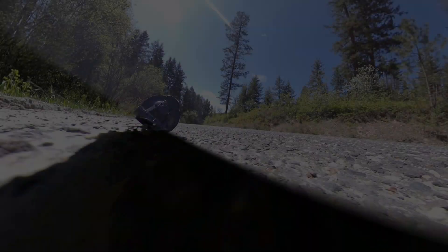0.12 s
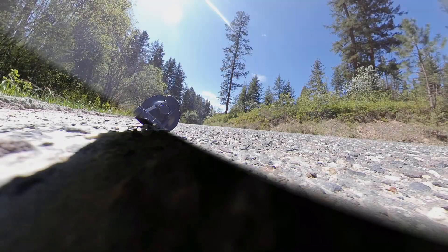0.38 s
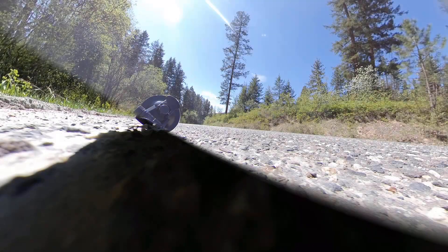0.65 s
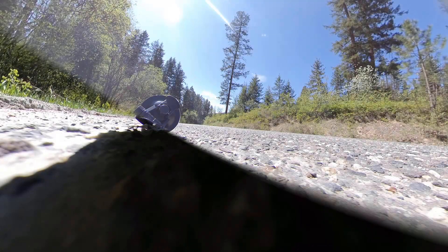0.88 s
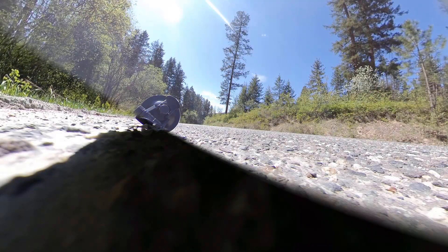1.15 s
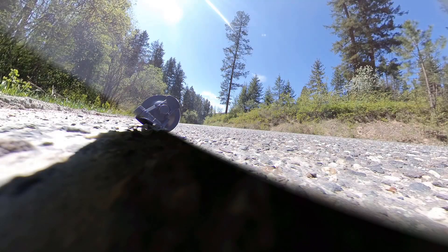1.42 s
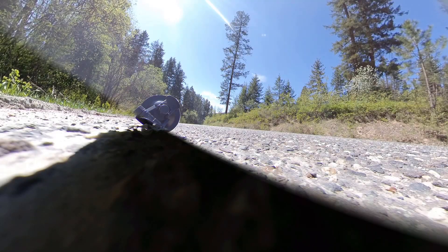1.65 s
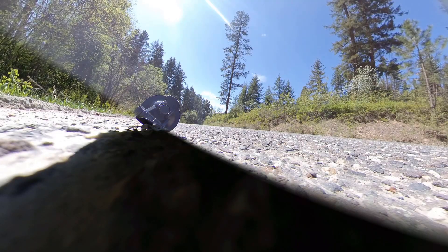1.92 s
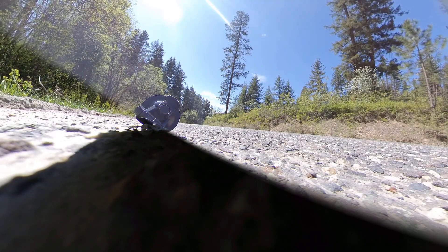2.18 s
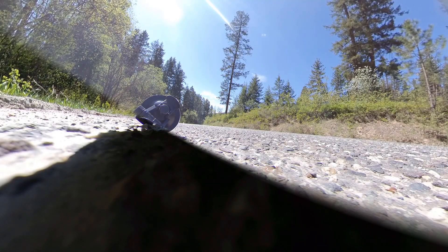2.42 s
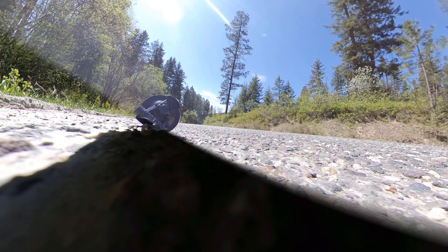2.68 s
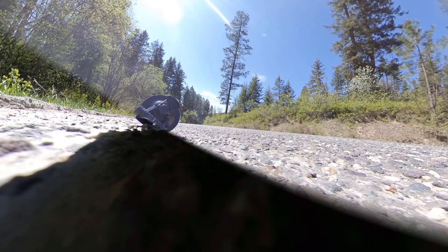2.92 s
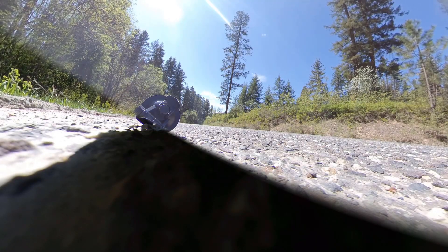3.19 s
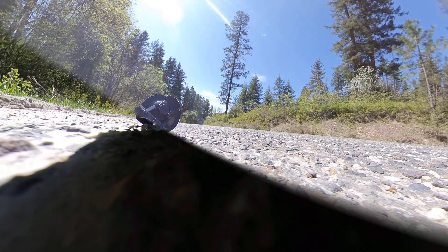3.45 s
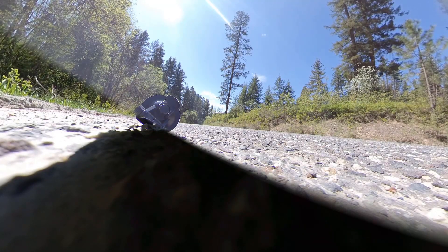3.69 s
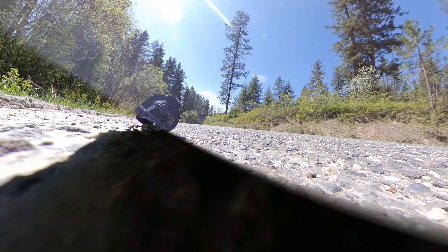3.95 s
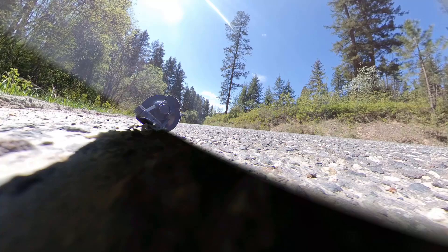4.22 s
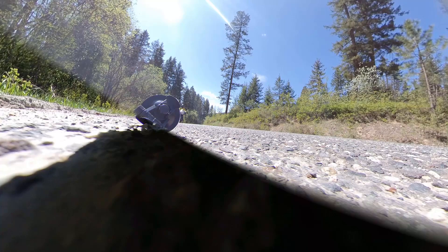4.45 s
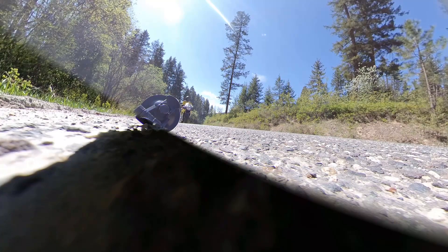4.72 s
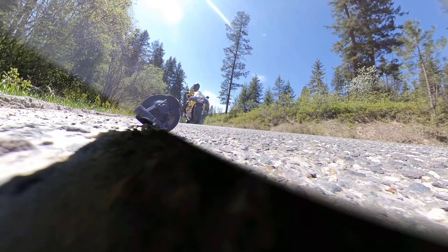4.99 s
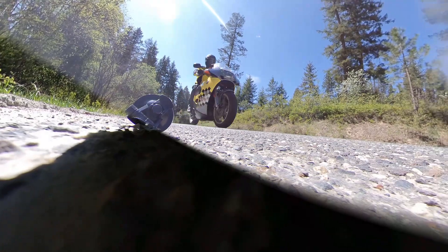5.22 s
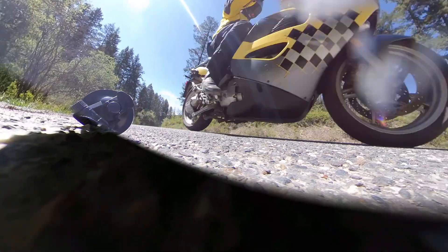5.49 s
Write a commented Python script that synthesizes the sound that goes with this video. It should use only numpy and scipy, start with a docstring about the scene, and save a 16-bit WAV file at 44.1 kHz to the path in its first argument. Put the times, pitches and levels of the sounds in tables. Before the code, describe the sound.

Outdoors on a forest road, a small stereo microphone on the ground picks up soft hush and thumping wind gusts. A distant four-cylinder motorcycle hums steadily louder, a few faint bird whistles chirp, then the throttle shuts, revs fall in an uneven burble, and the bike rolls close with tyre roar, metallic clatter, brake hiss and crunching grit, ending abruptly.

```python
"""Forest road with gravel edges: a four-cylinder motorcycle comes up to a small stereo microphone on the ground.
Pulses, one a firing, excite the exhaust and ring the engine cases; the throttle shuts and the falling revs burble.
Filtered noise makes the tyre roar, clatter, brake hiss and grit as it rolls close.
Low noise and damped swings make gusts thump on the ports; gliding sines are a far bird; the sound fades in."""
import sys
import numpy as np
from scipy import signal
from scipy.fft import rfft, irfft
from scipy.io import wavfile
from scipy.ndimage import uniform_filter1d

SR = 44100
rng = np.random.default_rng(int(sys.argv[2]) if len(sys.argv) > 2 else 0)


def digitize_waveform(pressure):
    """Quantize a signal to 16-bit integers and store it at the path in sys.argv[1].

    Rows of a 2-D input are taken as channels; values are limited to [-1, 1].
    """
    field = np.atleast_2d(pressure).T
    bounded = np.clip(field, -1, 1)
    quanta = np.round(bounded * 32767).astype(np.int16)
    wavfile.write(sys.argv[1], SR, quanta)


def volts(x):
    """Linear amplitude factor 10**(x/20) for a level x in dB, scalar or array-like."""
    e = np.asarray(x, float) / 20
    return 10 ** e


N = 247401
T = np.arange(N) / SR
HZ = np.fft.rfftfreq(512, 1 / SR)[:, None]
FRAME_T = (np.arange(N // 128 + 5) * 128) / SR

# firing rate as heard: t/s, rate/(firings per s)
FIRING_RATE = [(0, 104.7), (1.2, 103.1), (2.2, 99.6), (3, 96.9), (3.2, 95.5), (3.4, 92.9), (3.55, 89.7),
               (3.67, 88.3), (3.86, 73.8), (3.96, 74.4), (4.08, 66.4), (4.2, 72), (4.4, 65.1), (4.6, 53.6),
               (4.75, 49.9), (5.2, 41.8), (5.61, 37.6)]
# coherence of the two channels: f/Hz, left-right likeness (0 to 1)
COHERENCE = [(100, 1), (800, 0.92), (2000, 0.86), (5000, 0.21), (10000, 0.12), (16000, 0.16)]
# arrival at the ports: t/s, left lag/ms, factor on the likeness
ARRIVAL_LAG = [(0, 0.26, 0.61), (5.1, 0.35, 1), (5.35, 0.31, 0.99), (5.61, 0.29, 0.23)]
SHUT_S = 3.65  # the throttle begins to shut


def read(points, hz):
    """Spectral interpolation: a spectrum is read on a log-frequency axis."""
    f, value = np.transpose(points)
    return np.interp(np.log(hz + 1), np.log(f + 1), value)


def curves(rows, t):
    """Linear interpolation: each column of a table along time."""
    s, *columns = np.transpose(rows)
    return [np.interp(t, s, c) for c in columns]


def colour(x, points):
    """Minimum-phase filtering: the log gain fixes the phase, so the response is causal."""
    log_gain = np.log(volts(read(points, abs(np.fft.fftfreq(16384, 1 / SR)))))
    spectrum = np.exp(np.conj(signal.hilbert(log_gain)))
    taps = np.fft.ifft(spectrum).real[:6000]
    return signal.oaconvolve(x, taps)[:N]


def unit(points):
    """Power normalisation: the gain of a spectrum scaled to a total power of 1."""
    gain = volts(read(points, HZ))
    return gain / np.sqrt(np.sum(gain ** 2) * HZ[1])


def noise(gain, same=0, patchy_db=1.5, lagging=True):
    """Partially coherent noise: gain per root Hz over frequency and time, in drifting patches."""
    a, b, c, d, patches = rng.standard_normal((len(FRAME_T), len(HZ), 5)).T
    patches = uniform_filter1d(uniform_filter1d(patches, size=14, axis=1), size=6, axis=0)
    lag_ms = curves(ARRIVAL_LAG, FRAME_T)[0] * lagging
    right = a + 1j * b
    same = np.clip(same, 0, 1)
    left = same * right + np.sqrt(1 - same ** 2) * (c + 1j * d)
    left = left * np.exp(-2j * np.pi * HZ * lag_ms / 1000)
    z = np.array([left, right]) * gain * volts(patchy_db * patches / patches.std())
    return signal.istft(z * np.sqrt(HZ[1] * 3 / 2), nperseg=512, noverlap=384)[1][:, :N]


def to_ports(x):
    """Arrival-time difference: sound reaches the right port first, and is 1.1 dB stronger at the left."""
    late = np.interp(T - curves(ARRIVAL_LAG, T)[0] / 1000, T, x)
    return np.array([late * volts(1.1), x])


def forest():
    """Diffuse field: steady broadband hush, weakly coherent between the ports."""
    # hush of the forest: f/Hz, spectral level/dB per Hz
    hush = [(30, -109), (100, -73), (300, -76), (700, -83.5), (1500, -89), (2700, -94.5), (4600, -101),
            (8000, -109), (15500, -121), (16200, -140)]
    return noise(volts(read(hush, HZ)), 0.21, patchy_db=1.0)


def wind_db(t):
    """Superposed flow levels at left and right port: a breeze that dies down, with Gaussian gusts."""
    # gusts: t/s, half width/s, level at the left port/dB
    gust_rows = [(.38, 0.11, -35.5), (.55, 0.065, -33.5), (1, 0.038, -37.5), (1.19, 0.11, -35.5),
                 (1.9, 0.043, -40), (2.15, 0.11, -43)]
    breeze_db, lull_s, lull_db, shelter_db = -44, 2.12, -6.5, -8.5  # shelter: gusts, right port under left
    breeze = volts(breeze_db + lull_db * (1 + np.tanh((t - lull_s) / .1)) / 2)
    gusts = sum(volts(db) * np.exp(-((t - s) / width) ** 2) for s, width, db in gust_rows)
    return 20 * np.log10([breeze + gusts, breeze * volts(-5) + gusts * volts(shelter_db)])


def wind(lumpy_db=2.5, ring=.55, edge=1.5):
    """Turbulent pressure on the ports: incoherent lumpy low noise, with single damped thumps."""
    # buffeting noise: f/Hz, relative level/dB
    buffet = [(20, -17), (35, -19), (60, 0.5), (120, 2.5), (250, -2), (400, -14), (700, -25), (1500, -74)]
    # strongest thumps: t/s, peak level/dB, f/Hz, push +1 or pull -1, port (0 left, 1 right)
    thumps = [(.3602, -13, 250, 1, 0), (.3923, -14, 330, 1, 0), (.4918, -20, 129, -1, 0),
              (.5539, -17, 258, 1, 0), (.6071, -15, 264, 1, 0), (.6396, -21.5, 199, 1, 0),
              (.9807, -19, 210, -1, 0), (.998, -15.5, 330, 1, 0), (1.0344, -21, 195, -1, 1),
              (1.0817, -19, 237, -1, 0), (1.106, -21, 140, 1, 1), (1.1577, -16.5, 245, 1, 0),
              (1.2145, -24, 237, -1, 0), (1.8789, -15.5, 286, 1, 0), (1.9185, -19.5, 311, 1, 0),
              (2.1013, -18, 231, 1, 0)]
    # lesser thumps: rate, peak over the wind level, pitch range
    small_per_s, small_db, small_hz = 31, 7, (120, 328)
    white = rng.standard_normal((2, N))
    lumps = uniform_filter1d(uniform_filter1d(rng.standard_normal((2, N)), size=400), size=400)
    out = np.array([colour(w, buffet) for w in white])
    out *= volts(wind_db(T) + lumpy_db * np.clip(lumps / lumps.std(), -2, 2)) / out.std()
    t = np.arange(-400, 800) / SR
    a, b, c, d = rng.random((round(small_per_s * T[-1]), 4)).T
    at = .02 + a * (T[-1] - .05)
    side = (d > .7).astype(int)  # mostly the left port
    peak_db = wind_db(at)[side, np.arange(len(at))] + small_db
    small = zip(at, peak_db, np.interp(b, [0, 1], small_hz), c - .4, side)
    for s, db, hz, push, port in [*thumps, *small]:
        envelope = np.exp(-abs(t * hz / np.where(t < 0, .2, ring)) ** edge)
        swing = np.cos(2 * np.pi * hz * t) * envelope
        out[int(port > .5), round(s * SR) - 400:][:len(t)] += np.sign(push) * volts(db) * swing
    return out


def ticks(decay_s=.002):
    """Impact noise: grit blown against the left port gives short decaying clicks, fainter at the right."""
    # clicks: t/s, level/dB
    clicks = [(.356, -33), (.389, -36)]
    out, t = np.zeros(N), np.arange(600) / SR
    for s, db in clicks:
        out[round(s * SR):][:len(t)] += volts(db) * np.exp(-t / decay_s) * rng.standard_normal(len(t))
    return out * volts(np.array([[0], [-9]]))


def bird(echo_db=-14):
    """Frequency glides: short whistled sines, with one echo from the trees."""
    # notes: t/s, length/s, start f/Hz, end f/Hz, level/dB
    notes = [(2.815, .03, 3150, 2900, -57), (2.89, .01, 3250, 3100, -57), (2.912, .015, 2800, 3300, -57),
             (2.935, .025, 3250, 2950, -53), (2.975, .028, 3250, 2600, -52), (3.015, .027, 2900, 3600, -53),
             (3.44, .018, 3600, 2800, -55), (3.522, .018, 3050, 2700, -53), (3.668, .012, 3700, 3000, -52),
             (3.71, .035, 2450, 2550, -50), (3.385, .03, 3700, 3500, -57), (3.836, .018, 3500, 2200, -48),
             (3.86, .045, 2150, 2500, -49), (3.992, .012, 4000, 3100, -52), (4.02, .04, 2100, 2350, -51),
             (4.12, .035, 1950, 1900, -48)]
    out = np.zeros(N)
    for s, length, from_hz, to_hz, db in notes:
        hz = np.linspace(from_hz, to_hz, round(length * SR))
        whistle = np.sin(2 * np.pi * np.cumsum(hz) / SR)
        out[round(s * SR):][:len(hz)] += volts(db) * signal.windows.tukey(len(hz), .4) * whistle
    return to_ports(out + volts(echo_db) * np.roll(out, shift=900))


def throttle(t):
    """Two-stage closing, open 1 and shut 0: a linear snap to a share, with exponential ebb."""
    snap_s, snap_to, ebb_s = 0.037, 0.15, 0.097
    since = np.maximum(t - SHUT_S, 0)
    return (1 - (1 - snap_to) * np.minimum(since / snap_s, 1)) * np.exp(-since / ebb_s)


def heard(part, t):
    """Distance law: level/dB from (dB at 1 m, dB lost per doubled distance, dB gained per doubled revs)."""
    # the machine's approach: t/s, distance/m
    distance = [(0, 420), (1, 250), (2, 130), (3, 71), (3.6, 46), (4.2, 25), (4.6, 22.3), (4.9, 16.7),
                (5.1, 8.6), (5.28, 5.66), (5.45, 2.92), (5.61, 2.88)]
    near_db, fall_db, rev_db = part
    idle_per_s = 40  # firing rate at which the revs add nothing
    # treble skims the ground and falls faster than bass
    fall = fall_db * np.log2(curves(distance, t)[0])
    return near_db - fall + rev_db * np.log2(curves(FIRING_RATE, t)[0] / idle_per_s)


def crank(start=0.099):
    """Phase as integrated frequency: firings counted since the start."""
    return start + np.cumsum(curves(FIRING_RATE, T)[0]) / SR


def crunch(rise_s=0.0048):
    """Exponential decay: stones and knocks in noise bursts, each spread around its own centre."""
    # bursts as the wheels draw level: t/s, level/dB, centre f/Hz, spread in log frequency, t60/s
    bursts = [(4.982, -37.5, 2520, 0.41, 0.22), (5.052, -39.5, 2200, 0.76, 0.13),
              (5.114, -32.5, 2300, 0.37, .12), (5.344, -19, 2020, 0.5, 0.13),
              (5.414, -29, 2700, 0.55, 0.062), (5.431, -26.5, 2840, 0.16, 0.059),
              (5.45, -33, 7800, 0.13, 0.12), (5.478, -29, 740, 0.36, 0.16), (5.485, -27, 14500, .1, .15),
              (5.49, -32, 2430, 0.11, 0.18), (5.534, -26.5, 3560, 0.077, 0.15),
              (5.584, -18, 8140, 0.52, 0.041), (5.6, -19, 2770, 0.58, 0.15)]
    gain = np.zeros((len(HZ), len(FRAME_T)))
    for s, db, hz, width, t60 in bursts:
        age = FRAME_T - s
        shape = np.exp(-.5 * (np.log((HZ + 1) / hz) / width) ** 2) / np.sqrt(hz * width)
        decay = volts(db - 60 * np.maximum(age, 0) / t60)
        gain += shape * decay * np.clip(1 + age / rise_s, 0, 1)
    return noise(gain, read(COHERENCE, HZ), patchy_db=1.5)


def rolling(roar_puff=0.1, clatter_puff=0.059):
    """Amplitude modulation: tyre roar and engine clatter throb with the firings; brake hiss and grit do not."""
    # each scaled to unit power: f/Hz, relative level/dB per Hz
    roar_spectrum = [(60, -40), (150, -7), (300, -1), (450, -8.5), (620, 1), (780, -3), (1000, -8.5),
                     (1300, -18.5), (2500, -39)]
    clatter_spectrum = [(500, -14), (1000, 1.5), (1400, 1.5), (1750, -1), (2300, -2), (3000, -6.5),
                        (3800, -7.5), (5000, -13), (7000, -16.5), (10000, -26.5), (15000, -67)]
    brake_spectrum = [(3000, -44), (5000, -1), (6000, 4.5), (7300, 2.5), (7700, 8), (8150, 13), (8800, 6.5),
                      (9500, 0.5), (11000, -12), (13000, -36)]
    grit_spectrum = [(4500, -28), (7000, 7), (9500, 4), (11000, 3), (12500, 2), (14000, 6), (15700, 1),
                     (16200, -30)]
    # settings as in heard()
    tyres, engine = (-18, 5.82, 3.84), (-17, 6.14, 0.12)
    pads, grit = (-25, 9.3, .1), (-12, 11.44, 3.3)
    # brake pads bite, then ease off
    bite_s, bite_rise_s, bite_db, ease_s, ease_db_per_s = 4.474, 0.17, 12, 5.49, -200
    roar_db, clatter_db, brake_db, grit_db = (heard(part, FRAME_T) for part in (tyres, engine, pads, grit))
    brake_db += bite_db * np.clip((FRAME_T - bite_s) / bite_rise_s, 0, 1)
    brake_db += ease_db_per_s * np.maximum(FRAME_T - ease_s, 0)
    same = read(COHERENCE, HZ) * curves(ARRIVAL_LAG, FRAME_T)[1]
    puff = np.cos(2 * np.pi * crank())
    roar = noise(unit(roar_spectrum) * volts(roar_db), same, patchy_db=1.8) * (1 + roar_puff * puff)
    clatter = noise(unit(clatter_spectrum) * volts(clatter_db), same, patchy_db=2.42)
    clatter = clatter * (1 + clatter_puff * puff)
    # brake and grit add in power
    treble = np.hypot(unit(brake_spectrum) * volts(brake_db), unit(grit_spectrum) * volts(grit_db))
    return roar + clatter + noise(treble, 0.7, patchy_db=2.2, lagging=False)


def firings(chance=0.44, jitter=0.014):
    """Impulse train, one pulse a firing: with the throttle shut the cylinders fire more unevenly."""
    # strength of each cylinder's firing, in units of the unevenness
    cylinders = [-0.015, 0.53, -0.035, -1]
    # firings weaker or slightly stronger on the overrun: t/s, level change/dB
    level_changes = [(3.86, -13), (4.143, -30), (4.311, -13), (4.421, -2), (4.575, -12), (4.73, -1),
                     (4.825, 1.5), (4.915, -1), (5.085, -8), (5.465, -21)]
    even_db, uneven_db, change_s = 1.05, 4, 0.01  # unevenness open and shut; half width of a level change
    spread_db = uneven_db + (even_db - uneven_db) * throttle(T)
    turns = crank()
    at = np.flatnonzero(np.diff(np.floor(turns))) + 1
    luck = np.clip(rng.standard_normal((len(at), 2)), -2, 2)
    strength = np.take(cylinders, np.floor(turns[at]).astype(int) % 4) + chance * luck[:, 0]
    change_db = sum(db * np.exp(-((T[at] - s) / change_s) ** 2) for s, db in level_changes)
    period = SR / curves(FIRING_RATE, T[at])[0]  # samples
    at = np.clip(at + np.round(jitter * period * luck[:, 1]).astype(int), 0, N - 1)
    pulses = np.zeros(N)
    pulses[at] = period / np.sqrt(2) * volts(change_db + spread_db[at] * strength)
    return pulses


def resonate(x, hz, width):
    """Resonance: a doubled complex pole that may glide, scaled to a running power of 1."""
    turn = np.exp(2j * np.pi * np.cumsum(hz * np.ones(N)) / SR)
    r = np.exp(-np.pi * width / SR)
    rung = (turn * signal.lfilter([1], np.convolve([1, -r], [1, -r]), x / turn)).real
    return rung / np.sqrt(uniform_filter1d(rung ** 2, size=16000) + 1e-20)


def cases(pulses, rattle=3.3, ping_rattle=.6, ping_width=110):
    """Forced modes: firings and gear rattle ring the metal and plastic around the engine."""
    # modes of the plastic fairing: f/Hz, width/Hz, level/dB
    plastic_modes = [(610.5, 64, -0.5), (725.4, 49, 0)]
    # modes of the metal: f/Hz, width/Hz, level/dB
    metal_modes = [(476.7, 28, -2.5), (797, 60, 2), (2818, 85, -12), (3560, 84, -23)]
    # gliding metal ping: t/s, f/Hz, level/dB
    ping = [(0, 1550, -79), (4.5, 1546, -52), (4.9, 1500, -34.5), (5.25, 1350, -41), (5.61, 1320, -34)]
    plastic, metal = (-27.5, 4.44, -2.7), (-19, 7.85, 1.3)  # as in heard()
    knocks, gears = np.sqrt(pulses), rng.standard_normal(N)
    knocks /= knocks.std()
    hz, ping_db = curves(ping, T)
    out = volts(ping_db) * resonate(knocks + ping_rattle * gears, hz, ping_width)
    for modes, part in ((plastic_modes, plastic), (metal_modes, metal)):
        rung = sum(volts(db) * resonate(knocks + rattle * gears, f, width) for f, width, db in modes)
        out += volts(heard(part, T)) * rung
    return to_ports(out)


def exhaust(pulses, pipe_s=0.007, back=0.29):
    """Pipe reflection: a bark under load; on the overrun an echoed boom, a drone and a burble that follow the pulses."""
    # pipe, throttle open and shut: f/Hz, gain/dB
    pulling_pipe = [(20, -59), (60, -39), (95, -0.5), (190, 2), (290, -1), (390, -7), (490, -13),
                    (600, -20), (900, -40), (3000, -67.5)]
    coasting_pipe = [(20, -33), (45, -44.5), (85, -5), (118, 1), (140, 2.5), (162, 2), (210, -6),
                     (300, -9.5), (450, -22.5), (900, -41), (3000, -68)]
    # burble noise: f/Hz, relative level/dB
    burble_spectrum = [(40, -41), (100, 3.5), (150, -2.5), (200, 5), (300, -9.5), (400, -8.5), (800, -51.5)]
    # settings as in heard()
    bark, boom = (-2.4, 6.04, .6), (-26.5, 3.64, 4.3)
    drone_part, silencer = (-37.5, 0.95, 0.95), (-26.5, 2.16, .1)
    blow_db, blow_s = 7, 0.064  # the silencer huffs as the throttle shuts
    shut = 1 - throttle(T)
    huff_db = blow_db * np.exp(-np.maximum(T - SHUT_S, 0) / blow_s)
    flow = uniform_filter1d(uniform_filter1d(pulses, size=700), size=700)
    burble = colour(rng.standard_normal(N), burble_spectrum)
    burble *= shut * volts(heard(silencer, T) + huff_db) * flow / burble.std()
    tone = np.sqrt(2) * np.cos(2 * np.pi * (crank() - .2))
    drone = shut * flow * volts(heard(drone_part, T)) * tone
    pulling = pulses * (1 - shut) * volts(heard(bark, T))
    coasting = pulses * shut * volts(heard(boom, T))
    # each pulse runs back along the pipe and returns weaker
    echoed = sum(back ** k * np.roll(coasting, round(k * pipe_s * SR)) for k in range(4))
    return to_ports(colour(pulling, pulling_pipe) + colour(echoed, coasting_pipe) + burble + drone)


def scene():
    """Linear superposition of forest, wind, bird and machine."""
    # balance of the rolling noise and crunch: f/Hz, left over right/dB
    left_db = [(60, 3.5), (1300, 1.1), (2200, 1), (3500, -0.5), (6000, 1.4), (15000, -3.5)]
    balance = read(left_db, np.fft.rfftfreq(N, 1 / SR))
    machine = rolling() + crunch()
    machine[0] = irfft(rfft(machine[0]) * volts(balance), N)
    pulses = firings()
    background = forest() + wind() + ticks() + bird()
    return background + machine + cases(pulses) + exhaust(pulses)


def capsule_hiss():
    """Self-noise: one white noise, coloured separately for each capsule."""
    # f/Hz, spectral level/dB
    hiss_left = [(1000, -105), (8000, -110), (10000, -109), (12000, -106), (12800, -106), (13600, -104),
                 (14400, -108), (15700, -109), (16200, -135)]
    hiss_right = [(1000, -105), (8000, -110), (10000, -109), (12000, -106), (12800, -105), (13600, -100),
                  (14400, -105), (15700, -106), (16200, -135)]
    white = noise(np.ones((len(HZ), 1)), 1.0, patchy_db=1.5, lagging=False)
    return np.array([colour(white[0], hiss_left), colour(white[1], hiss_right)])


def roll_off(x):
    """The treble ends steeply here."""
    return signal.sosfilt(signal.butter(12, 16710, fs=SR, output="sos"), x)


def record(dry):
    """Band limitation: capsule hiss is added, the treble ends at an edge and the level fades in."""
    edge_hz, fade_s, fade_db_per_s = 15900, 0.54, 110  # the fade-in ends at fade_s
    band = signal.firwin(511, edge_hz, window=("kaiser", 9), fs=SR)[None]
    limited = signal.oaconvolve(dry + capsule_hiss(), band, "same")
    mix = limited * volts(fade_db_per_s * np.minimum(T - fade_s, 0))
    return roll_off(mix)


dry = scene()
out = record(dry)
digitize_waveform(out)
```